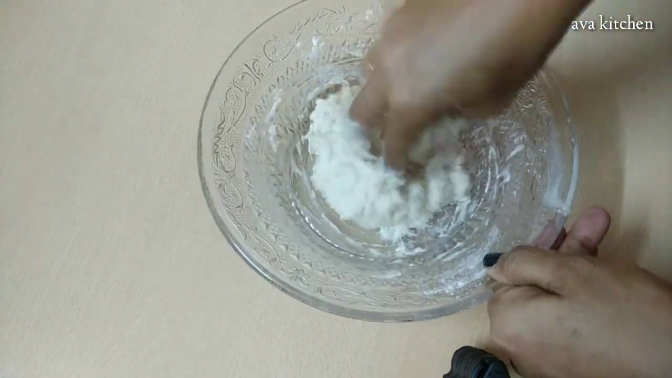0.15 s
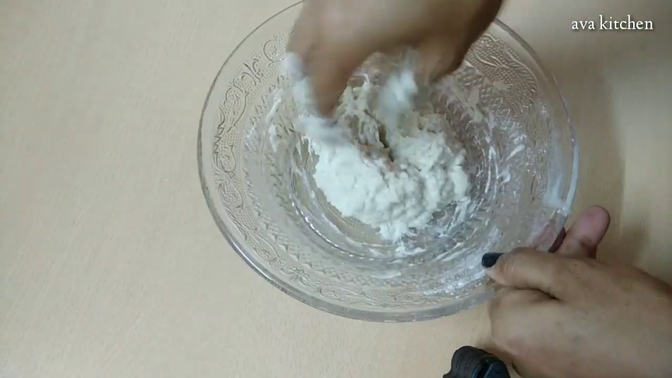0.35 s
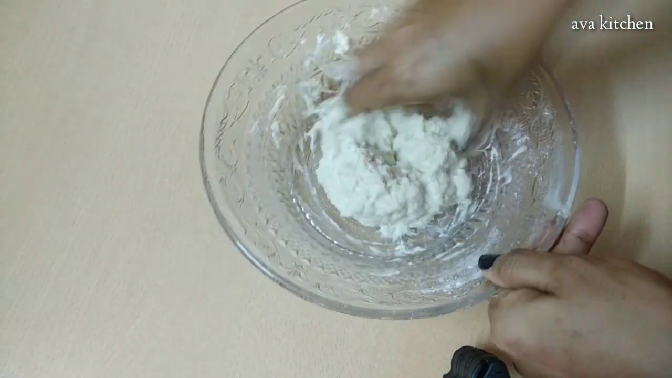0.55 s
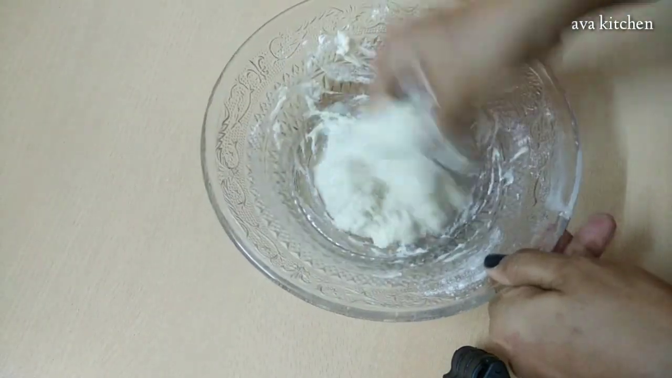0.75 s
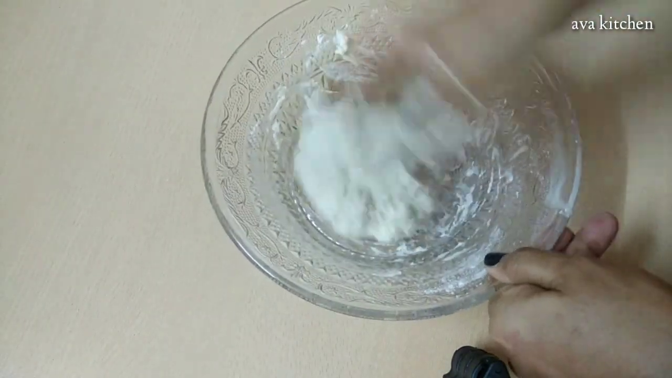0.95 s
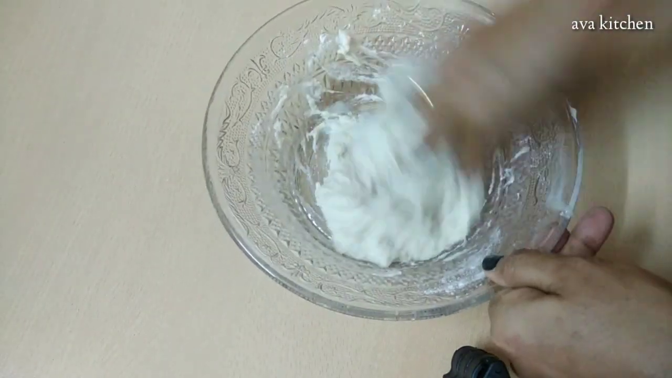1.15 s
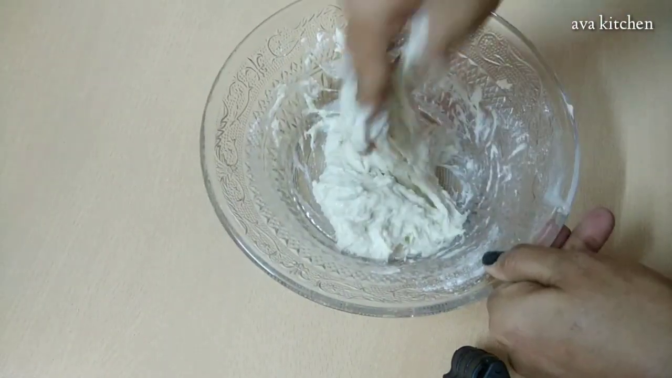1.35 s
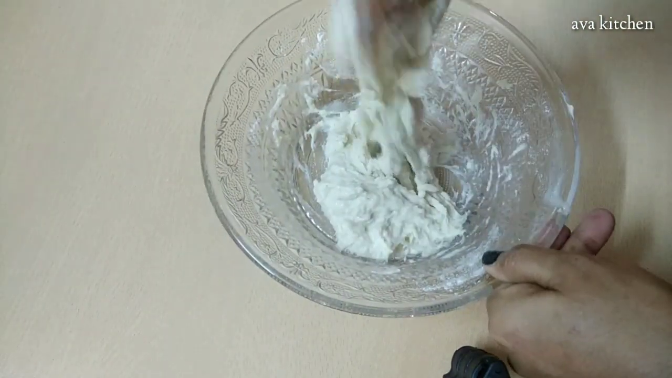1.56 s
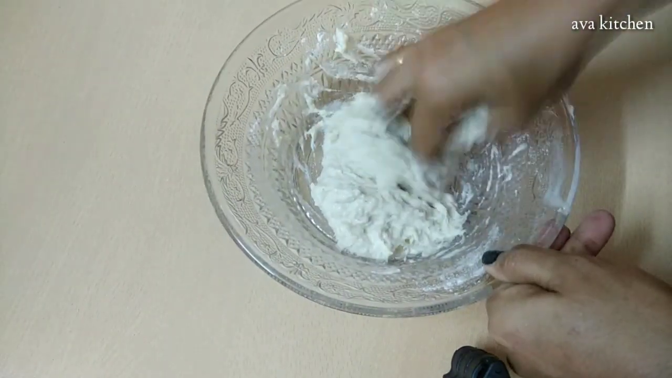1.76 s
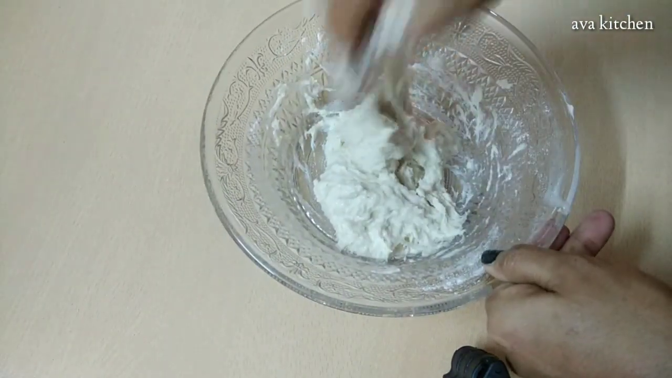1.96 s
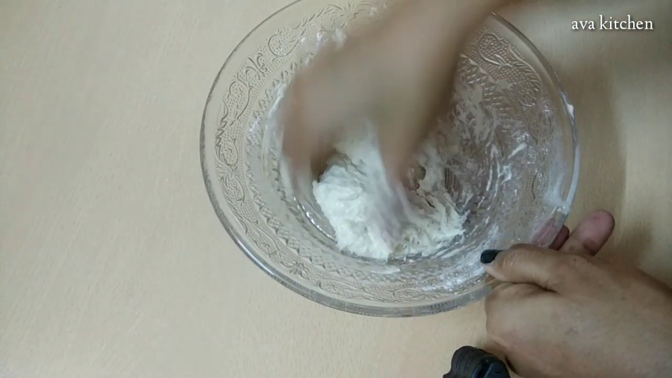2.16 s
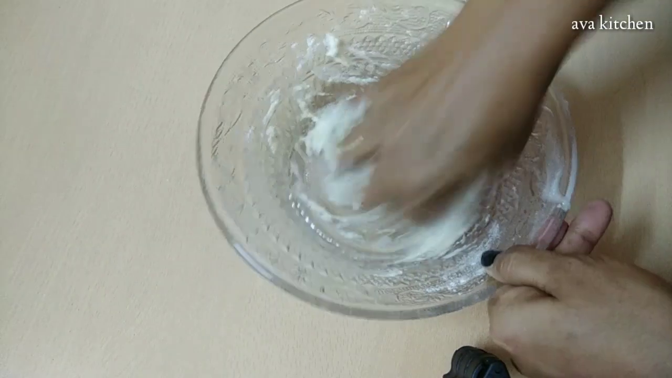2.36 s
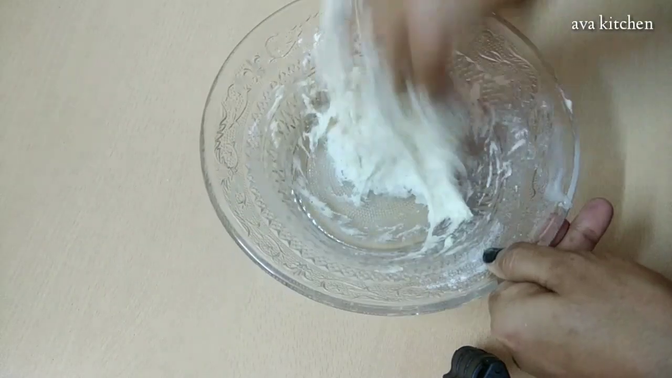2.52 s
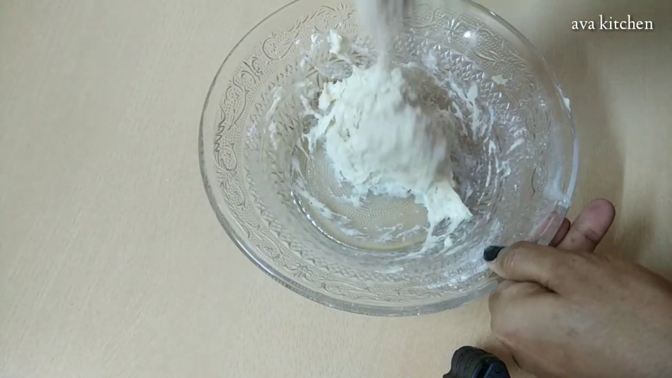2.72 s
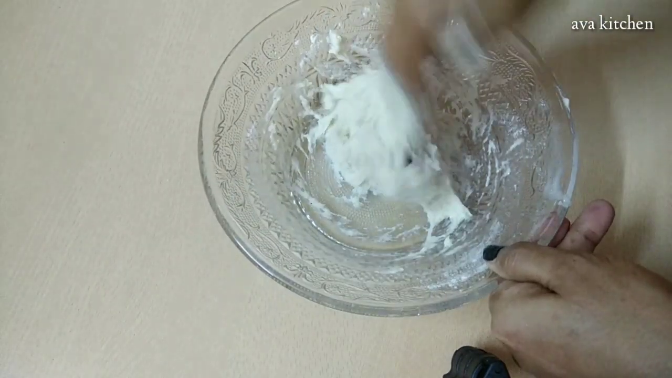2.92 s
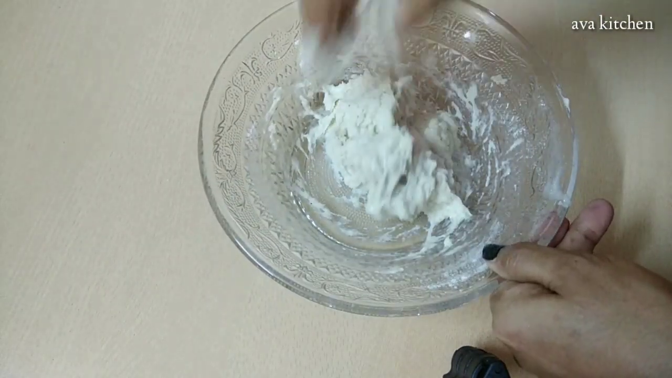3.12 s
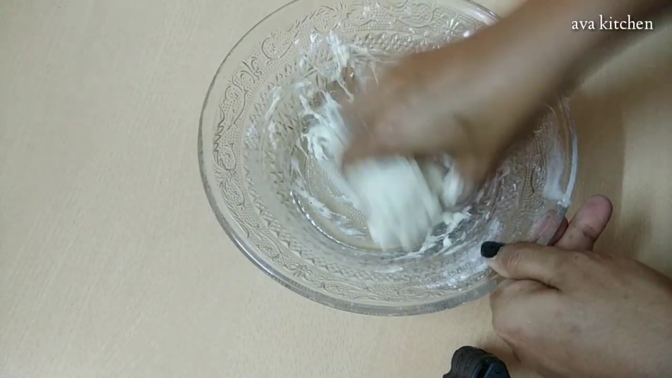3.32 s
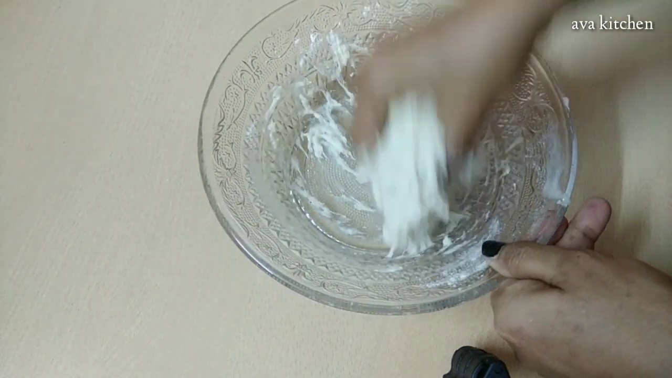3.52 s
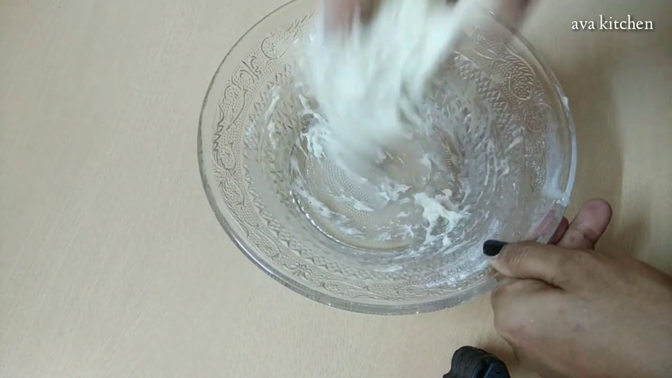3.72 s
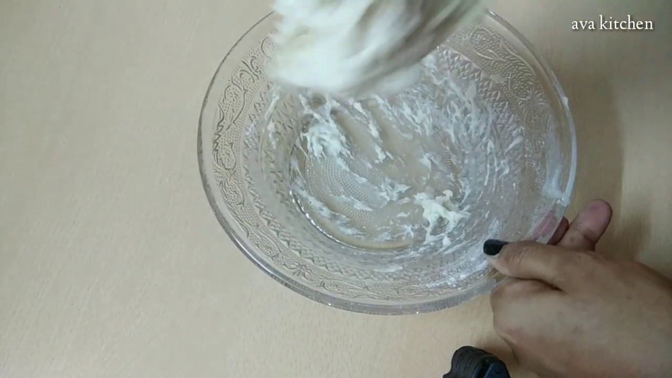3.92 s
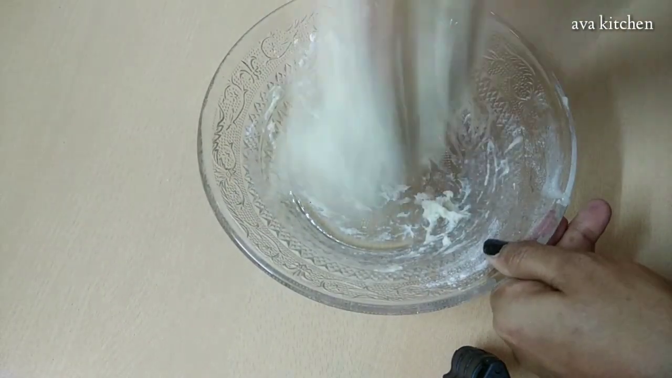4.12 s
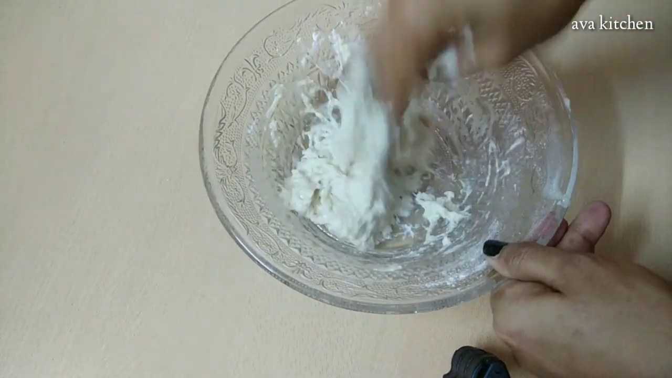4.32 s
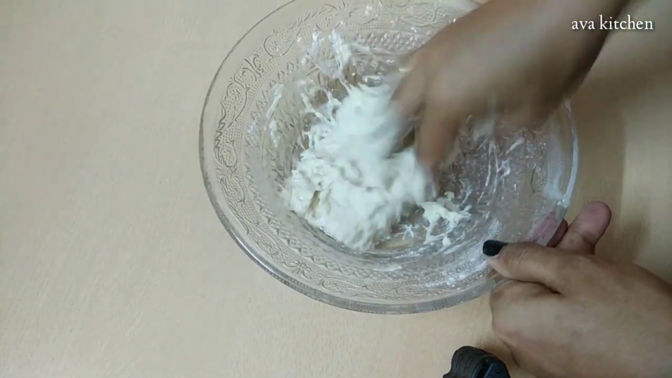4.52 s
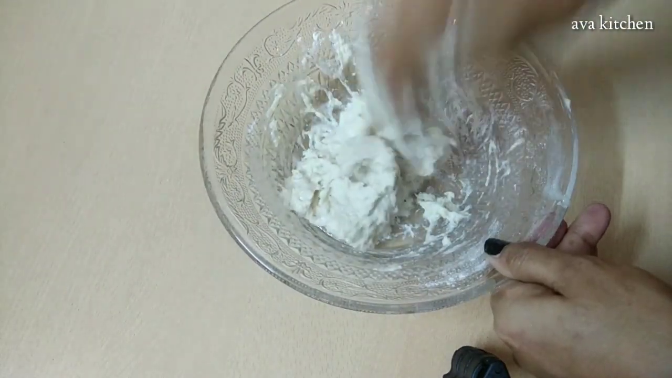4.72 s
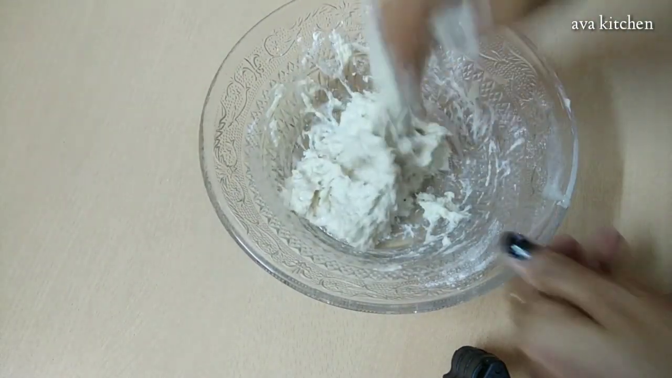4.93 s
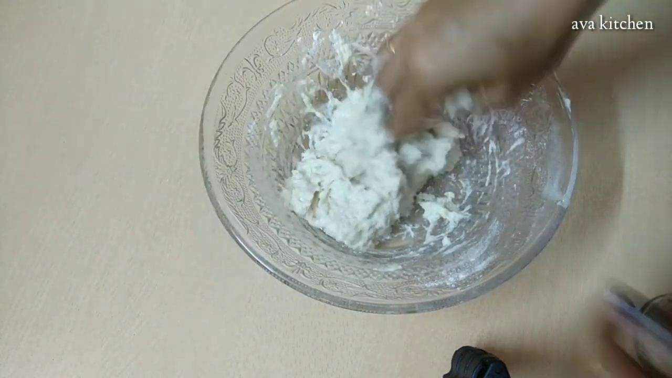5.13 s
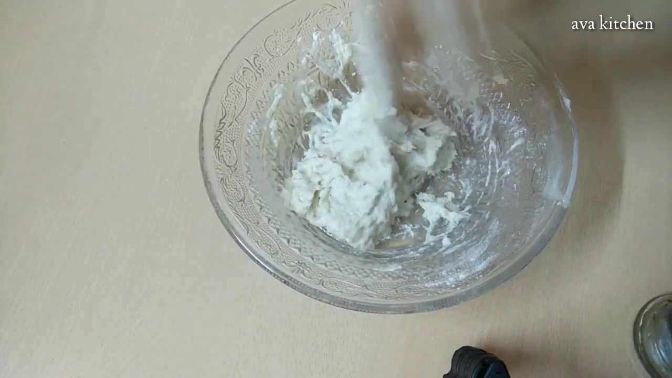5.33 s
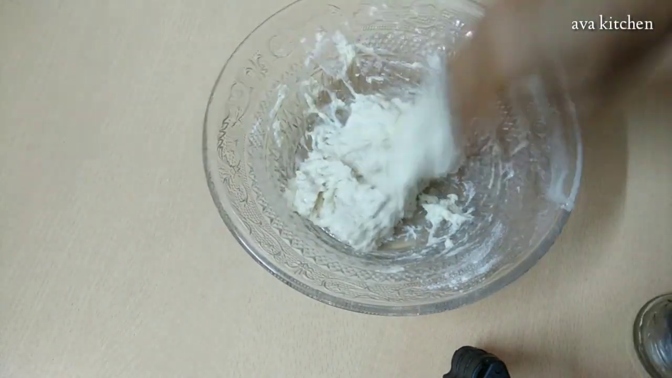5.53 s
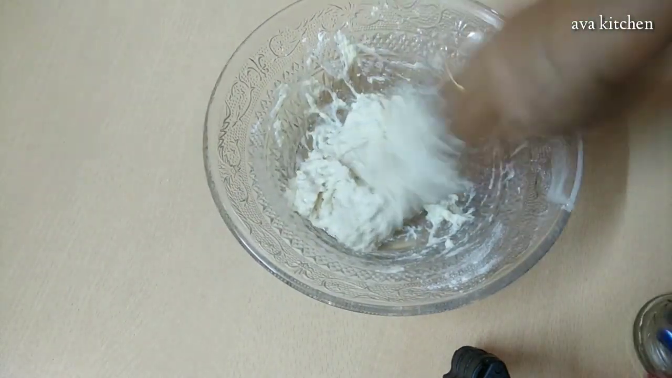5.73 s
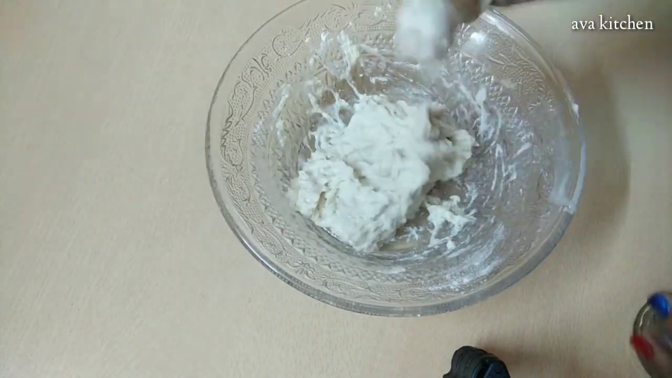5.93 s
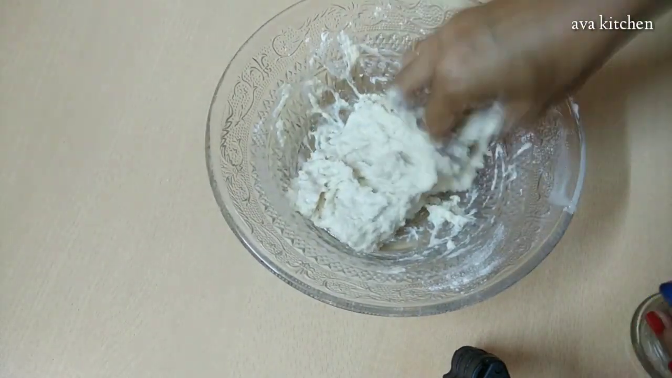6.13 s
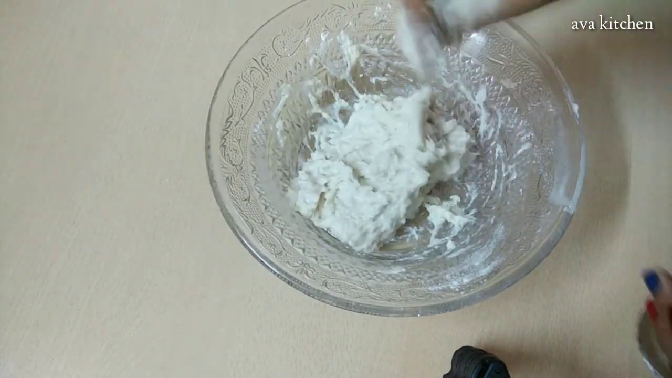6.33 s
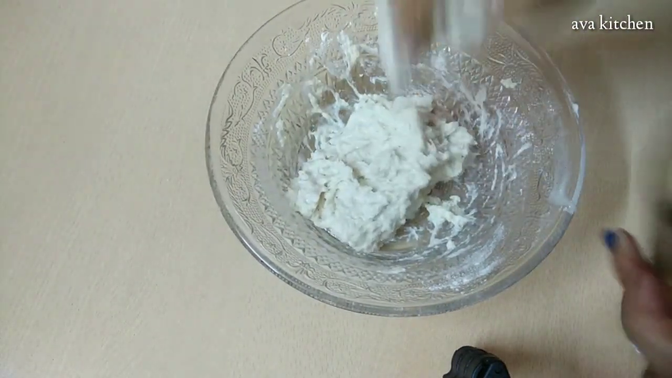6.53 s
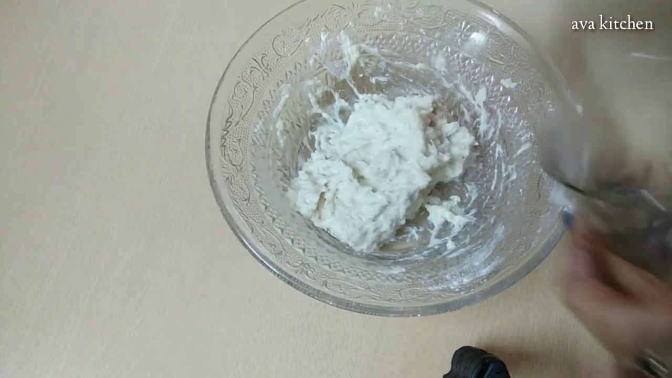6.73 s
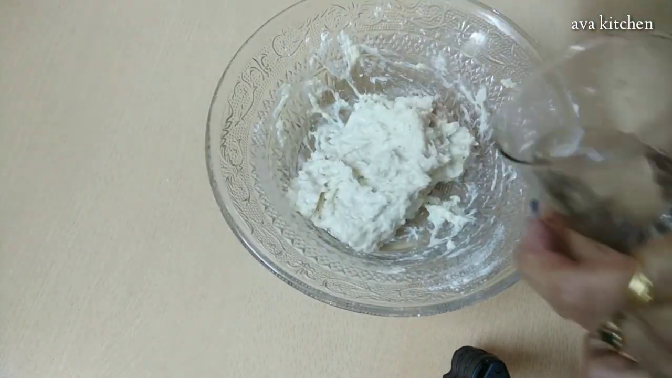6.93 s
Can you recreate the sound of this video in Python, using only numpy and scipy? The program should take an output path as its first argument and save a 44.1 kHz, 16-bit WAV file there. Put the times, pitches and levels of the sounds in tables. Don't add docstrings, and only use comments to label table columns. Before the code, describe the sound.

Close up, fingers pull sticky batter in a glass bowl: bursts of bright crackle over low wet squelch, with scattered air-pocket clicks. The bowl knocks the table hard just after one second and again past two, then the lump slaps down at four with a volley of cracks. Afterwards the pulls grow fainter. A small kitchen hums low, and a distant horn sounds briefly. Phone stereo, with background swelling and closing under a noise gate.

```python
import sys
import numpy as np
from scipy import signal
from scipy.fft import rfft, irfft, next_fast_len
from scipy.io import wavfile
from scipy.ndimage import uniform_filter1d

SR = 44100
rng = np.random.default_rng(int(sys.argv[2]) if len(sys.argv) > 2 else 0)


def wav_out(sig):
    wavfile.write(sys.argv[1], SR, np.round(np.clip(np.atleast_2d(sig).T, -1, 1) * 32767).astype(np.int16))


def field_ratio(decibels):
    return 10 ** (np.asarray(decibels, dtype=float) / 20)


N = 307356
TIME = np.arange(N) / SR


def curve(table):
    s, *columns = np.transpose(table)
    return [np.interp(TIME, s, column) for column in columns]


def unit(x):
    return x / np.sqrt(np.mean(x ** 2))


def colour(x, points):
    hz, db = np.transpose(points)
    size = next_fast_len(len(x))
    log_f = np.log(np.arange(size // 2 + 1) * SR / size + 1)
    weight = field_ratio(np.interp(log_f, np.log(hz), db, -80, -80))
    return unit(irfft(rfft(x, size) * weight, size)[:len(x)])


def ring(x, hz, t60):
    pole = np.exp((2j * np.pi * hz - np.log(1000) / t60) / SR)
    return signal.lfilter([0, pole.imag], [1, -2 * pole.real, abs(pole) ** 2], x)


def grains(rate, spread_db):
    hit = rng.random(N) < rate / SR
    size_db = np.minimum(spread_db * rng.exponential(size=N), 15)
    return hit * rng.standard_normal(N) * field_ratio(size_db)


def flicker(rate, db):
    k = int(SR / rate)
    steps = np.repeat(rng.standard_normal(N // k + 1), k)
    return field_ratio(db * uniform_filter1d(steps, k)[:N])


def patches(x, edges_hz, rate, db):
    size = next_fast_len(N)
    band = np.digitize(np.arange(size // 2 + 1) * SR / size, edges_hz)
    z = rfft(x, size)
    return sum(irfft(z * (band == k), size)[:N] * flicker(rate, db) for k in range(len(edges_hz) + 1))


GATE_SHUT_S, GATE_DB_S = 6.52, 44


def swells(start, hold, db, rise, fall, quiet_db=-140., size=32):
    start, hold, db = (np.reshape(v, (-1, 1)) for v in (start, hold, db))
    t = TIME[::size]
    shape = db - rise * np.maximum(start - t, 0) - fall * np.maximum(t - start - hold, 0)
    idle = quiet_db - GATE_DB_S * np.maximum(t - GATE_SHUT_S, 0)
    return np.interp(TIME, t, np.sqrt(np.sum(field_ratio(shape) ** 2, axis=0) + field_ratio(idle) ** 2))


def ports(x, pan_db, lag):
    size = next_fast_len(N)
    f = np.arange(size // 2 + 1) / size
    left = irfft(rfft(x, size) * np.exp(-2j * np.pi * f * lag), size)[:N]
    return np.array([left * field_ratio(pan_db / 2), x * field_ratio(-pan_db / 2)])


# centre_hz, t60_s, level_db
KITCHEN_BANDS = [(121, 0.33, 3), (318, 0.7, -5.5), (754, 0.26, -4), (2070, 0.33, 0), (5230, 0.3, 6.5),
                 (11000, 0.21, 8.5)]


def room(x, wet_db, alike, lag):
    t = np.arange(SR // 2) / SR
    tail = 0
    for hz, t60, db in KITCHEN_BANDS:
        band = signal.butter(2, [hz / 1.6, min(hz * 1.5, SR * .45)], "band", fs=SR, output="sos")
        noise = signal.sosfilt(band, rng.standard_normal((3, len(t))))
        share = np.clip(alike if hz > 200 else .95, 0, 1)
        common = np.array([np.roll(noise[0], lag), noise[0]])
        both = np.sqrt(share) * common + np.sqrt(1 - share) * noise[1:]
        decay = field_ratio(db - 60 * t / t60) * np.minimum(t / 0.0012, 1)
        tail = tail + decay * both / np.sqrt(t60 * SR / 14)
    return field_ratio(wet_db) * signal.fftconvolve(x[None], tail, axes=1)[:, :N]


def hiss():
    points = [(1200, -6), (3000, 0), (5000, -10), (16000, -14)]
    return field_ratio(-89) * colour(rng.standard_normal(2 * N), points).reshape(2, N)


# start_s, hold_s, level_db
HORN_PARTIALS = [
    (4.49, .08, -60),
    (4.54, 0.026, -58),
    (4.53, 0.053, -62.5),
    (5.9, 0.033, -71),
]
# time_s, pitch_hz
HORN_GLIDE = [(4.4, 481), (4.5, 484), (4.55, 494), (4.62, 490), (4.7, 496), (4.9, 498)]


def far_horn():
    phase = 2 * np.pi * np.cumsum(curve(HORN_GLIDE)[0] * flicker(30, 0.05)) / SR
    out = 0
    for k, ((start, hold, db), fall_db_s) in enumerate(zip(HORN_PARTIALS, [50, 60, 65, 300])):
        gain = np.sqrt(2) * swells(start, hold, db, 140, fall_db_s) * flicker(30, 5)
        out = out + gain * np.sin((k + 1) * phase)
    return out


# time_s, pitch_hz, level_db
MOTOR_WHINE = [(6.0, 1015, -85.5), (6.3, 1034, -82), (6.6, 1026, -72), (6.8, 1150, -78), (6.97, 1225, -81)]


def far_motor():
    hz, db = curve(MOTOR_WHINE)
    blur = unit(uniform_filter1d(rng.standard_normal(N), size=250))
    whine = field_ratio(db) * (TIME > MOTOR_WHINE[0][0]) * blur * np.sin(2 * np.pi * np.cumsum(hz) / SR)
    moan = swells(3.3, 0.099, -61, 360, 90) * unit(ring(rng.standard_normal(N), 490, 0.033))
    peep = swells(6.9, .07, -96, 300, 300) * np.sin(2 * np.pi * 3000 * TIME)
    return whine + moan + peep


# pitch_hz, width_hz
LOW_RESONANCES = [
    (119, 4.7),
    (168, 15),
    (225, 38),
]
# depth_share, offset_db
RESONANCE_REACH = [
    (1.2, -0.7),
    (0.01, 2),
    (-0.22, -2.5),
]
# start_s, hold_s, level_db, depth_db
LEANS = [(0.0, 0.013, -52, 6.5), (0.268, 0.11, -50, 4), (0.906, 0.34, -53.5, -6.5), (1.182, 0.15, -41.5, 2),
         (1.551, 0.075, -59.5, 5.5), (2.003, 0.43, -52, 3), (2.685, 0.34, -54.5, -7.5),
         (3.054, 0.11, -58, 5.5), (3.769, 0.11, -60.5, -12), (4.042, 0.067, -53.5, 19.5),
         (4.281, .03, -53.5, -1), (4.606, 0.057, -53.5, 3), (5.313, 0.065, -52.5, -8),
         (5.83, 0.21, -56, -2), (6.2, 0.36, -61, -3)]


def rumble():
    start, hold, db, depth_db = np.transpose(LEANS)
    fall_db_s, idle_db = [92, 67, 59], [-77.5, -67, -64]
    out = 0
    for (hz, width), (share, off_db), fall, quiet_db in zip(LOW_RESONANCES, RESONANCE_REACH, fall_db_s, idle_db):
        gain = swells(start, hold, db + share * depth_db + off_db, 301.5, fall, quiet_db)
        hum = unit(ring(ring(rng.standard_normal(N), hz, 2.2 / width), hz, 0.96 / width))
        beat = (0.13 + uniform_filter1d(hum ** 2, size=1500)) ** 0.18
        out = out + gain * hum / beat
    return out * field_ratio(-132.5 * np.maximum(TIME - 6.72, 0))


# start_s, hold_s, level_db
GLASS_SPRAYS = [(1.15, .01, -44), (1.192, .04, -49), (2.176, .02, -56), (2.15, .02, -63), (4.2, 0.028, -49),
                (5.835, 0.27, -65.5), (6.3, 0.18, -73.5), (1.03, .05, -64), (.565, 0.036, -66)]
# pitch_hz, density_db (per Hz)
SPRAY_COLOUR = [(1500, -20), (2100, 2), (2800, -3.5), (3400, -3.5), (4000, -19.5)]
# start_s, level_db
NAIL_TICKS = [(4.607, -37.5), (5.83, -48.5), (2.637, -50), (1.527, -43)]


def glass():
    spray = colour(rng.standard_normal(N), SPRAY_COLOUR) * swells(*np.transpose(GLASS_SPRAYS), 4000, 200)
    force = np.zeros(N)
    for s, db in NAIL_TICKS:
        force[int(s * SR)] = field_ratio(db)
    nails = ring(force, 1100, 0.029) + 1.4 * ring(force, 1260, 0.021) + 1.1 * ring(force, 1700, .016)
    return spray + nails


# pitch_hz, level_db, t60_s
TABLE_MODES = [(117, -28.5, 5.0), (170, -12.5, 1.3), (268, -6.5, 0.29), (300, -2.5, 0.19), (443, 0, 0.1),
               (548, -6.5, 0.43), (690, -7, 0.11), (817, -6, 0.4), (884, -8.5, 0.37), (1040, -16.5, 0.28),
               (1130, -20, 0.17), (1450, -28, 0.053), (1820, -32.5, 0.81), (2330, -16.5, 1.2)]
# lag_s, level_db
REPEATS = [
    (.0029, -10.5),
    (.0058, -17),
]


def strike_table(blows, spread_s, click_db, push_s, count):
    s, db, hard_db, boom_db = np.transpose(blows)[:, :, None]
    late = rng.random((len(s), count, 2)).mean(axis=2)
    at = ((s + .0012 + spread_s * (late - .6)) * SR).astype(int)
    sign = np.where((rng.random(at.shape) < .5) & (count > 1), 1, -1) / np.sqrt(count)
    top, boom = np.zeros(N), np.zeros(N)
    for hz, mode_db, t60 in TABLE_MODES:
        reach = .1
        if hz < 200:
            reach = boom_db + 11.5
        elif hz > 650:
            reach = hard_db + 11.5
        force = np.zeros(N)
        force[at] = sign * field_ratio(db + reach + mode_db + 1.7 * rng.standard_normal(at.shape))
        mode = ring(force, hz, np.clip(0.097 * t60, .015, .3))
        if hz < 200:
            boom += mode
        else:
            top += mode
    force = np.zeros(N)
    force[at] = sign * field_ratio(db + hard_db + click_db)
    top += ring(force, 840, 0.0096)
    top = signal.sosfilt(signal.butter(3, [270, 2000], "band", fs=SR, output="sos"), top)
    top = signal.sosfilt(signal.butter(4, 1750, fs=SR, output="sos"), top)
    push = signal.windows.hann(int(push_s * SR))
    out = field_ratio(-31.5) * np.convolve(top + boom, push)[:N]
    return out + sum(field_ratio(echo_db) * np.roll(out, int(lag * SR)) for lag, echo_db in REPEATS)


# start_s, peak_db, hard_part_db, boom_db
BOWL_KNOCKS = [(0.252, -35, -40, 0.5), (1.1685, 1.5, -13, -42), (1.1775, -5.5, -16, -24),
               (1.1835, -10.5, -16, -27), (1.1938, -8, -12, -30), (1.2062, -11, -15, -26),
               (1.2208, -17, -12, -30.5), (1.255, -13, -27.5, -25.5), (2.173, -8.5, -7, -43),
               (2.199, -10.5, -9.5, -39), (2.2315, -16, -24, -29), (2.334, -12.5, -8.5, -14.5),
               (2.352, -54, -29, -20), (2.362, -27, -9, -26), (2.769, -16, -11, -14.5),
               (2.784, -25, -36.5, -5), (4.013, -8, -9.5, -12), (4.024, -16.5, -14, -10),
               (4.033, -20, -20, -10), (4.041, -17, -25, -12), (4.054, -19, -25, -10),
               (4.075, -22, -25, -10), (4.1235, -13.5, -9, -9), (4.605, -35.5, -8.5, -1),
               (5.826, -31.5, -16, -12.5)]
# start_s, peak_db, hard_part_db, boom_db
BATTER_PLOPS = [(0.048, -34.5, -44, -6), (0.379, -49.5, 9, 1.5), (.41, -49, 7.5, -5), (0.54, -49, -8, 9),
                (0.882, -42.5, -14, -10.5), (0.925, -47.5, 3.5, -9), (1.004, -36.5, -11, -16.5),
                (1.025, -33.5, -5.5, -11), (1.049, -30.5, -6.5, -8), (1.075, -36.5, -6, -11),
                (1.525, -36.5, -13, 2), (2.009, -54, 4, -15.5), (2.048, -44.5, 9, -26),
                (2.075, -29, -3.5, -16), (2.106, -26.5, -31, -2.5), (3.834, -45.5, -25.5, -12.5),
                (5.33, -41.5, 5, 5), (5.343, -42, -4, 1.5), (5.625, -42, 1, -1.5),
                (5.848, -32.5, -10.5, -8), (5.875, -35, -20, -6)]


def thuds():
    hard = strike_table(BOWL_KNOCKS, 0, 3.0, 0.00051, count=1)
    soft = strike_table(BATTER_PLOPS, 0.04, 1.7, .0009, count=24)
    return field_ratio(5.5) * hard + field_ratio(1.0) * soft


# pitch_hz, level_db, t60_s
KITCHEN_MODES = [(260, -54.5, 0.36), (330.8, -51.5, 0.36), (423, -51, 0.15), (496, -51.5, 0.17)]


def hollow(thud):
    return sum(field_ratio(db) * ring(thud, hz, t60) for hz, db, t60 in KITCHEN_MODES)


# pitch_hz, density_db (per Hz)
SLAP_COLOUR = [(240, -34), (400, -2.5), (780, -14), (1030, -7.5), (1980, -9), (3200, -2.5), (4170, -18),
               (5260, -26.5), (5780, -11.5), (7410, -13), (8650, -7.5), (10300, -9.5), (14900, -14.5),
               (15600, -19), (16400, -32.5)]


def slap():
    start_s, rise_db_s = 4.0095, 5500.5
    crack = swells(start_s, 0.005, -6, rise_db_s, 3000.5)
    tail = swells(start_s, 0.0039, -31.5, rise_db_s, 1102)
    volley = colour(grains(24000, 2.5), SLAP_COLOUR) * (crack + tail)
    return signal.sosfilt(signal.butter(2, 450, "high", fs=SR, output="sos"), volley)


# start_s, peak_db, pitch_hz, low_part_db, left_minus_right_db
LARGE_POCKETS = [(0.2593, -25, 10000, -24, -8.5), (0.3055, -20.5, 12100, -47, 7),
                 (0.323, -32, 10900, -19, 19), (0.3765, -25.5, 11800, -14, -11),
                 (0.4756, -31.5, 12700, -13, 8), (0.5682, -7, 14180, -31, 10.5),
                 (.5712, -20.5, 13950, -28, 8), (0.5757, -19, 13440, -36, 6.5),
                 (.5892, -23.5, 11700, -26, 6), (0.8805, -23.5, 8990, -19, 1), (0.9607, -29, 6800, -20, 7),
                 (1.002, -25, 12200, -25.5, 18.5), (1.5273, -26.5, 10500, -32, -14),
                 (1.5394, -23.5, 12400, -20, 18.5), (1.6782, -21, 14070, -29.5, -3.5),
                 (2.132, -33, 9730, -16, -20), (2.1793, -27.5, 11000, -7, 7),
                 (2.6357, -10.5, 13560, -28, 1), (3.0265, -17.5, 11000, -16.5, 7.5),
                 (3.0984, -16, 8270, -37, 13.5), (3.3036, -36.5, 8900, -17.5, -20),
                 (3.3314, -26.5, 13000, -19, -4), (3.423, -21, 14030, -20.5, 13),
                 (3.7521, -30.5, 15490, -33, 17), (5.2924, -29.5, 8070, -36, 6),
                 (5.9913, -18, 14400, -31.5, 3)]
# start_s, peak_db, pitch_hz
SMALL_POCKETS = [(0.4149, -21, 15400), (.5157, -27.5, 14500), (0.5985, -27, 14600), (0.6058, -24, 13500),
                 (1.1457, -32.5, 11000), (1.3764, -24, 14600), (1.4176, -31.5, 11300), (1.6245, -30, 11000),
                 (1.9669, -40, 11330), (2.1481, -24, 10500), (2.7102, -37, 10800), (3.131, -23.5, 12500),
                 (3.3715, -34, 10600), (3.4126, -20, 12100), (3.5046, -30.5, 13700), (3.8467, -27, 13300),
                 (4.4176, -30.5, 12700), (4.4522, -26.5, 13600), (4.4895, -24, 13000), (4.5957, -27, 15000),
                 (4.9903, -32, 15100), (5.0225, -28, 11900), (5.222, -31, 9800), (5.3813, -27.5, 13310),
                 (5.7523, -29.5, 11900), (5.7703, -27, 12030), (5.9207, -26.5, 11800), (6.2491, -37, 15030),
                 (6.316, -31.5, 11740), (6.3416, -31.5, 11100),
                 (0.0393, -38, 13000), (0.0897, -34, 12100), (0.1381, -38, 15200), (0.3834, -30, 8140),
                 (0.4294, -36, 11500), (0.4894, -32, 11400), (0.8465, -35, 14100), (1.6586, -31, 13800),
                 (2.0168, -37, 9640), (2.5491, -45, 11200), (2.5671, -42, 15200), (2.8165, -37, 11900),
                 (3.0464, -36, 10700), (3.1914, -36, 10700), (3.2196, -34, 12000), (3.3534, -31, 10200),
                 (3.4524, -35, 10400), (3.4944, -31, 10500), (3.5678, -46, 10700), (3.6566, -46, 14200),
                 (3.8003, -39, 15400), (4.2936, -37, 11100), (4.5161, -35, 10100), (4.6753, -34, 12300),
                 (4.7047, -33, 13500), (4.8928, -42, 12100), (4.9117, -38, 11900), (5.4051, -38, 10800),
                 (5.5493, -48, 11900), (5.6072, -40, 12200), (5.6311, -37, 12800), (5.7149, -46, 13400),
                 (5.8835, -35, 11000), (6.0257, -33, 10400), (6.0871, -39, 13400),
                 (.8614, -30, 11800), (1.512, -30, 14300), (2.1141, -30, 9260), (3.4054, -29, 13000),
                 (4.5815, -41, 13400), (5.1991, -47, 14000), (5.2674, -41, 10300), (5.907, -35, 11000)]


def pops():
    small = map(tuple, SMALL_POCKETS)
    rows = LARGE_POCKETS + [row + (-31.5, 8) for row in small]
    s, db, hz, low_db, pan_db = np.transpose(rows)[:, :, None]
    lead_s = .007
    t = np.arange(1024) / SR - lead_s
    burst = np.exp(-np.abs(t - .0006) / np.where(t > .0006, .0007, .0004))
    skirt = .05 * np.exp(-np.abs(t) / np.where(t > 0, .004, .0025))
    spit = rfft(rng.standard_normal((len(rows), len(t))) * (burst + skirt))
    f = np.arange(513) * SR / 1024 + 1
    high = np.exp(-(np.log2(f / hz) / 0.19) ** 2) + 0.14 * (f > 4200)
    low = field_ratio(low_db + 9.0) * np.exp(-(np.log2(f / 2600) / 1.7) ** 2)
    peak = np.abs(irfft(spit * high)).max(axis=1, keepdims=True)
    shots = irfft(spit * (high + low)) / peak * field_ratio(db - 2.0)
    out, pan, weight = np.zeros((3, N + 1024)) + 1e-18
    for start, shot, side in zip(((s[:, 0] - lead_s) * SR).astype(int), shots, pan_db[:, 0]):
        out[start:start + 1024] += shot
        pan[start:start + 1024] += side * shot ** 2
        weight[start:start + 1024] += shot ** 2
    side_db = uniform_filter1d(pan, size=64) / (uniform_filter1d(weight, size=64) + 1e-12)
    return out[:N], side_db[:N]


# pitch_hz, density_db (per Hz)
CRACKLE_COLOUR = [(1060, -38.5), (1800, -21.5), (2730, -8), (2960, -13.5), (4370, -8.5), (5300, -7.5),
                  (8810, -8), (10800, -4), (14900, -3), (15900, -10), (16400, -28)]
# pitch_hz, density_db (per Hz)
SQUELCH_COLOUR = [(180, -25), (300, 3.5), (445, -2.5), (505, 3), (615, -6.5), (922, -4.5), (1220, -8),
                  (1340, -8), (1750, -14), (2400, -15.5), (3600, -18.5), (4680, -40.5)]
# start_s, hold_s, crackle_db, squelch_db
FINGER_PULLS = [(0.0, 0.097, -53, -58.5), (0.29, 0.25, -49.5, -57), (0.545, 0.17, -55.5, -63.5),
                (0.856, 0.083, -53, -58), (0.975, 0.21, -48.5, -56), (1.217, 0.2, -55, -56),
                (1.543, 0.081, -48.5, -60), (2.001, 0.23, -52.5, -53), (2.078, 0.11, -52, -66),
                (2.33, 0.23, -57.5, -64.5), (2.642, 0.17, -54.5, -59), (3.03, 0.16, -52, -61),
                (3.331, 0.072, -47, -65.5), (3.761, 0.11, -57, -75.5), (4.024, 0.079, -44, -52),
                (4.285, 0.22, -57, -61.5), (4.594, 0.16, -53, -62), (4.908, 0.16, -58.5, -67),
                (5.22, 0.13, -57.5, -70), (5.316, .06, -62.5, -61), (5.595, 0.086, -62.5, -69),
                (5.751, 0.21, -64.5, -77.5), (5.853, 0.2, -54, -64.5), (6.253, 0.15, -65, -76)]


def pulls():
    start, hold, crackle_db, squelch_db = np.transpose(FINGER_PULLS)
    rise_db_s = 350
    tearing = swells(start, hold, crackle_db, rise_db_s, 105.5, -80.5)
    wetness = swells(start, hold, squelch_db, rise_db_s, 74.5, -82.5)
    fizz = grains(1100, 4) + .25 * rng.standard_normal(N)
    tear = patches(colour(fizz, CRACKLE_COLOUR), [4500, 9000, 12500], 14, 3)
    tear = tear * tearing * flicker(60, 4.0)
    bubbles = grains(1700, 2.0) + 0.43 * rng.standard_normal(N)
    wet = patches(colour(bubbles, SQUELCH_COLOUR), [600, 1000, 1500, 2200], 9, 3.5)
    wet = wet * np.minimum(wetness, field_ratio(-53)) * flicker(15, 2.5)
    return tear, wet


def scene():
    tear, wet = pulls()
    pop, pop_pan_db = pops()
    smack = slap()
    thud = thuds()
    near = ports(tear, 6, 4.43) + ports(pop, pop_pan_db, 4.58)
    near = near + ports(smack, .1, 3.5) + ports(wet + glass(), 0.27, 6.6)
    low = ports(thud + hollow(thud), 0.33, 0.34)
    low = low + ports(rumble() + far_horn() + far_motor(), .2, 1.5)
    treble = field_ratio(-13) * pop + field_ratio(-9) * tear + field_ratio(-10) * smack
    walls = room(treble, 0, 0.17, 3.3) + room(wet, 3.1, 0.2, 1) + room(thud, 2.5, 0.22, 0)
    return hiss() + near + low + walls


# pitch_hz, left_minus_right_db
PORT_LEAN = [(60, -2.5), (110, -3.5), (200, 2.5), (380, 2.5), (700, -1), (1290, 1.5), (2380, -1),
             (4400, -0.5), (8120, -5), (15000, 4)]


def port_colour(x):
    size = next_fast_len(N)
    f = np.arange(size // 2 + 1) * SR / size
    lean = np.interp(f, *np.transpose(PORT_LEAN)) * np.array([[.5], [-.5]])
    return irfft(rfft(x, size) * field_ratio(lean), size)[:, :N]


def gate_murmur(x):
    loudness = np.abs(uniform_filter1d(np.mean(x ** 2, axis=0), size=4000)) ** .3
    alike = colour(rng.standard_normal(N), [(12, -7.0), (45, -5), (70, 2.0), (95, -9.0)])
    opposed = colour(rng.standard_normal(N), [(12, 0), (30, 0.5), (45, -13)])
    return loudness * (field_ratio(-51.5) * alike + field_ratio(-59.5) * opposed * np.array([[1], [-1]]))


def thin_treble(x, under_db, scatter_db):
    _, _, z = signal.stft(x, SR, nperseg=1024)
    mid = slice(35, 210)
    bands = z[:, mid].reshape(2, 25, 7, -1)
    power = 10 * np.log10(np.mean(np.abs(bands) ** 2, axis=(0, 2)) + 1e-18)
    dip = np.clip(power - uniform_filter1d(power, size=15), -4, 12)
    luck = uniform_filter1d(rng.standard_normal(power.shape), size=5) * scatter_db
    spared = 2.5 * np.maximum(7 - np.arange(25), 0)[:, None]
    keep = 1 / (1 + np.exp(-np.clip(2 * (dip + luck + under_db + spared), -30, 30)))
    bar = np.clip(np.arange(175) / 60, 0, .6)[:, None] * np.repeat(10 ** (power / 10), 7, axis=0)
    strong = np.mean(np.abs(z[:, mid]) ** 2, axis=0) > bar
    click = np.clip((np.mean(dip, axis=0) - 3.5) / 2, 0, 1)
    thinned = (.008 + np.repeat(keep, 7, axis=0)) * (.15 + .95 * strong)
    z[:, mid] *= .8 * click + (1 - click) * thinned
    return signal.istft(z, SR, nperseg=1024)[1][:, :N]


def top_cut(x):
    return signal.sosfilt(signal.butter(12, 16500, fs=SR, output="sos"), x)


def record(dry):
    x = port_colour(dry)
    x = signal.sosfilt(signal.butter(4, 105, "high", fs=SR, output="sos"), x) + field_ratio(-34) * x
    x = x + gate_murmur(x)
    x = signal.sosfilt(signal.ellip(8, .2, 30, 15700, fs=SR, output="sos"), x)
    rounded = x / (1 + x ** 6) ** (1 / 6)
    mix = thin_treble(rounded, 3, 16)
    return top_cut(mix)


dry = scene()
out = record(dry)
wav_out(out)
```